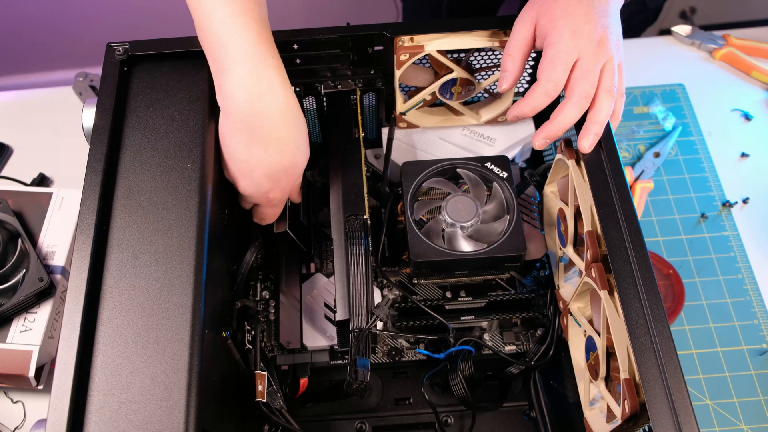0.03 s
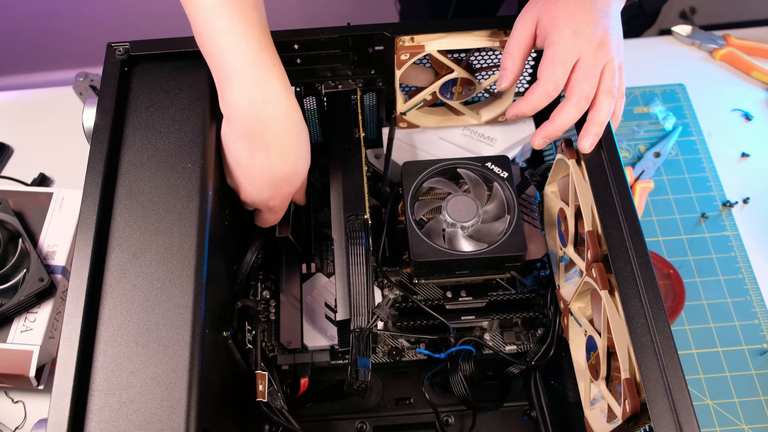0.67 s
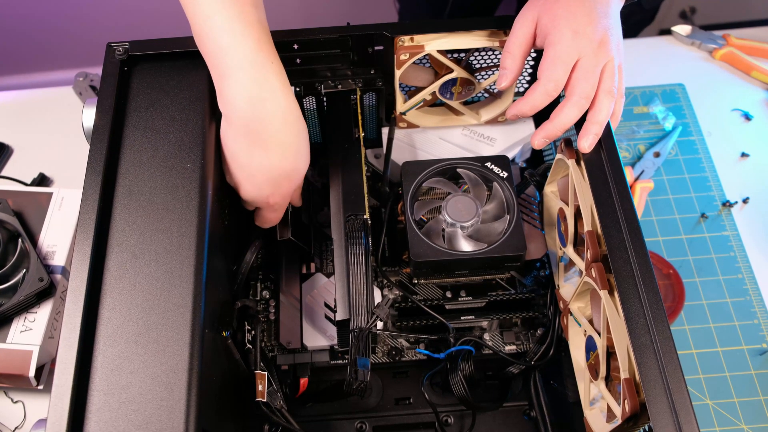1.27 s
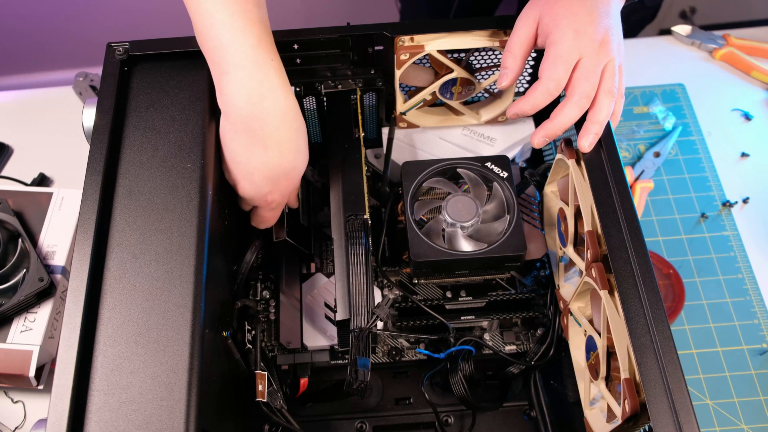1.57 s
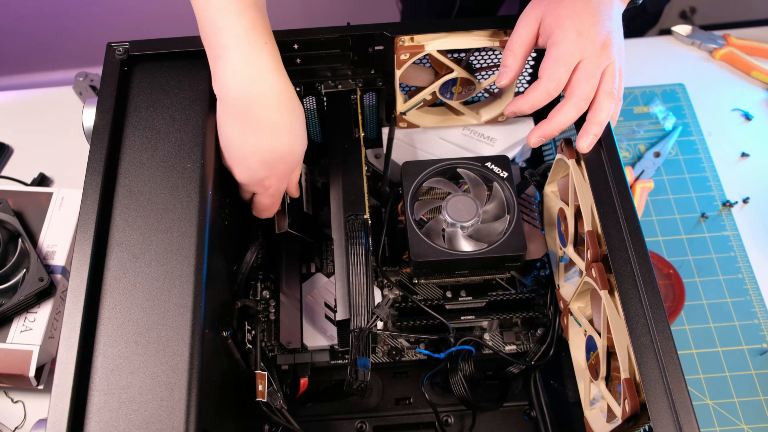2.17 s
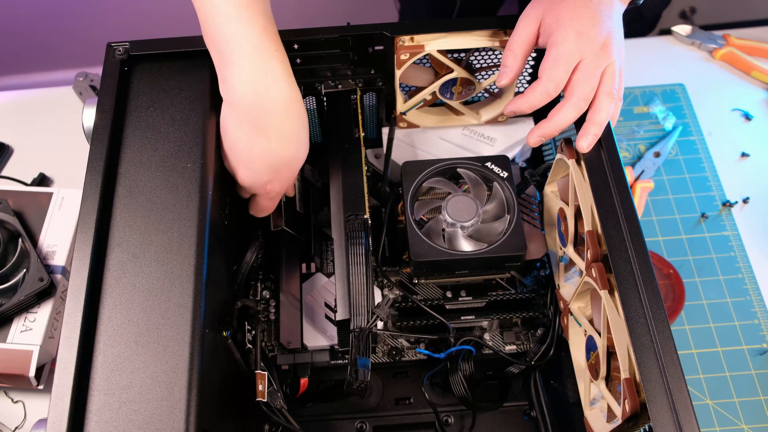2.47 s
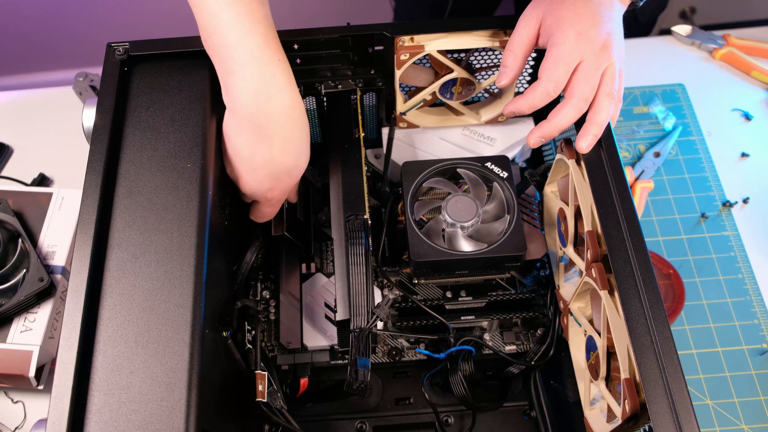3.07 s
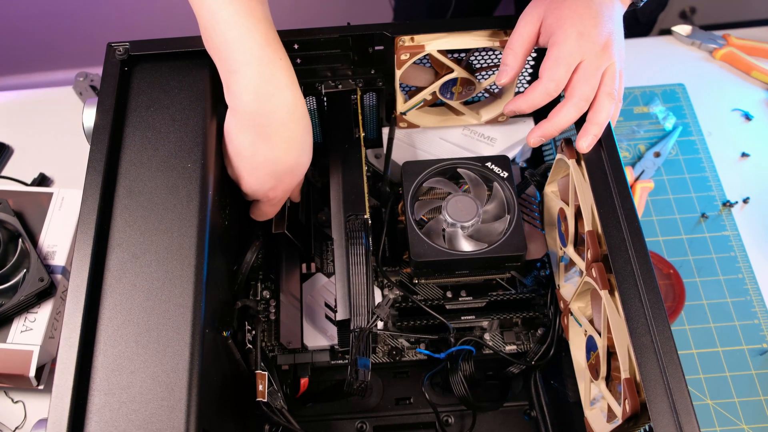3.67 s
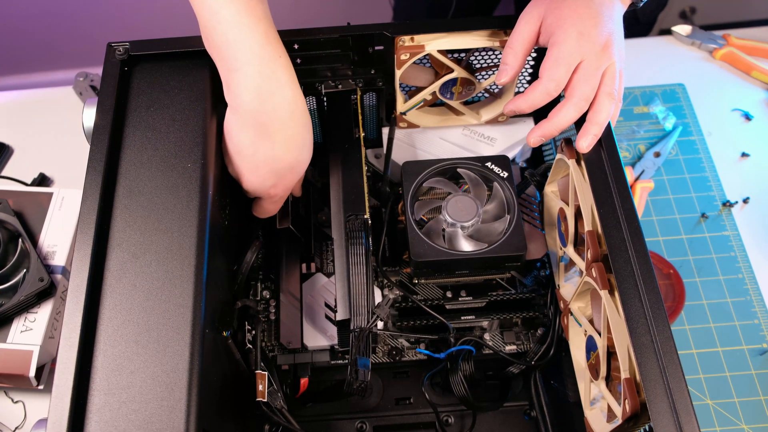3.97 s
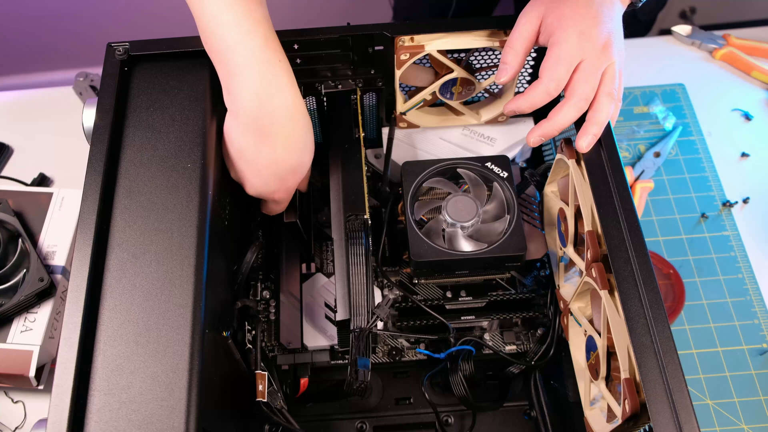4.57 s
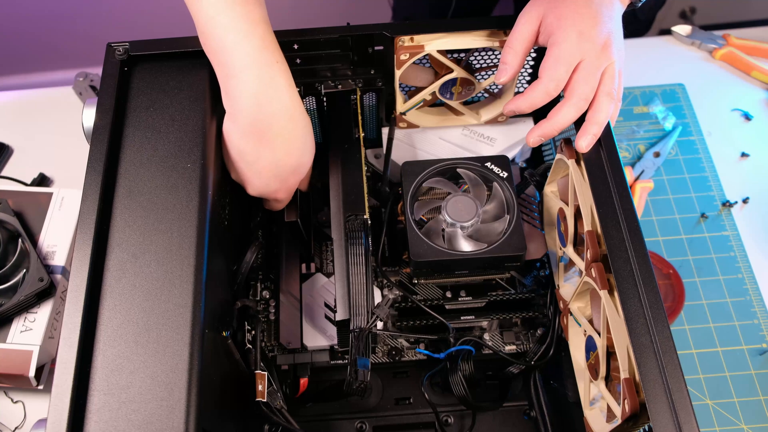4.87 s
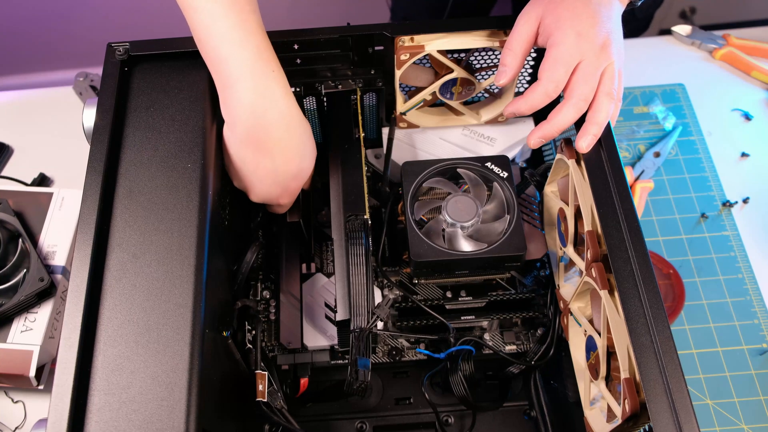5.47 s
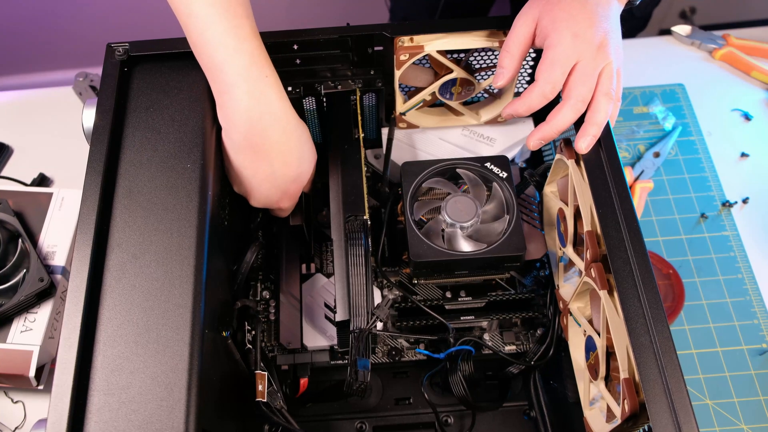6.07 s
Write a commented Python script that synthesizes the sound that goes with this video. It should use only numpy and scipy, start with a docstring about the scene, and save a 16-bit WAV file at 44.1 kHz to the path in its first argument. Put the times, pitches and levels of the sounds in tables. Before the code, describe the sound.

Hands work a card into its slot in an open steel computer case, close to the microphone in a small room. Sharp knocks and short scrapes come first, each leaving a brief metallic ring. After a lull, more clicks, a quick high squeak and a tiny creak follow. It ends with a run of soft plastic taps over a faint low rumble.

```python
"""In a small room, a hand works an expansion card into its slot in an open steel computer case, close by.
The card slides, knocks and scrapes, and fingers brush the frame; each contact sets the case ringing.
The card's edge squeaks and the frame groans as they stick and slip under pressure. Later a plastic part
is nudged with a run of soft taps. The steel panels ring on and the room echoes, over a faint rumble."""
import sys
import numpy as np
from scipy import signal
from scipy.fft import rfft, irfft, next_fast_len
from scipy.io import wavfile

SR = 44100
rng = np.random.default_rng(int(sys.argv[2]) if len(sys.argv) > 2 else 0)


def unload_audio(sound):
    """Save the sound as a 16-bit wav file, at the path given as the first command line argument."""
    columns = np.transpose(np.atleast_2d(sound))
    # keep every value between -1 and 1, then stretch to whole-number steps
    steps = np.round(np.clip(columns, -1, 1) * 32767)
    wavfile.write(sys.argv[1], SR, steps.astype(np.int16))


N = 279153
T = np.arange(SR // 5) / SR   # time within one short sound

# Levels are relative. A ring time (t60) is how long a sound takes to fade by 60 dB.
# notes at which the case rings: f/Hz, width/Hz, level/dB
CASE_MODES = [(435, 20, -12.5), (635, 49, 1.5), (923, 18, -18.5), (944, 19.3, -14.5), (1574, 100, -11),
              (1945, 34, -15.5), (2044, 370, -7.5), (2436, 150, -6.5), (2700, 34, -14), (3010, 150, -18.5),
              (4366, 56, -15), (5100, 86, -10), (5740, 53, -22.5), (5740, 22, -15.5), (6100, 44.4, -24.5),
              (7250, 128, -22.5), (7600, 110, -19), (7505, 50, -15.5), (7600, 36.3, -29), (9000, 52, -39),
              (9180, 46, -27), (10600, 72, -34.5)]
# spectrum of the many small parts on the board: f/Hz, level/dB
SMALL_PARTS = [(35, -46), (60, -27), (159, -13), (335, -13), (359, -12.5), (486, -28), (642, 0),
               (1070, -35), (1590, -13), (3190, -5.5), (3760, -17), (4960, -18), (15500, -42)]
# pitches that the case hardly gives off: f/Hz, width/Hz, depth/dB
CASE_DIPS = [(497, 29, -6.5), (1167, 354, -6), (3700, 590, -6.5)]
# fingers and card sliding lightly: t/s, length/s, level/dB
SLIDES = [(-.04, 0.073, -51), (0.556, 0.16, -52.5), (1.028, 0.16, -48.5), (2.51, 0.18, -59),
          (3.027, 0.15, -60.5), (3.594, 0.2, -56), (4.402, 0.095, -52), (4.723, .12, -59), (5.531, 1, -68)]
# card hitting the case: t/s, level/dB, brightness/(dB per octave), cut in thump and tick/dB, chatter/s
CARD_KNOCKS = [(0.042, -48, -7.5, 23, 0.0073), (0.292, -27, 0.5, 14.5, 0.0022), (0.378, -55, -6, 8, 0.0079),
               (0.505, -49.5, -6.5, 16, 0.042), (0.539, -39, -4, 7.5, 0.0063), (0.627, -43, 2, 7, .014),
               (0.656, -31, .2, 6, 0.025), (0.6725, -27, -1.2, 8, 0.0067), (1.076, -46, -3.5, 5, 0.011),
               (1.0975, -26, -0.55, 6.5, 0.012), (1.106, -25.5, -0.4, 3, 0.0077),
               (2.527, -51, -0.7, 6.5, .009), (2.8734, -37.5, 1.9, 5.5, 0.0038),
               (2.905, -43.5, 1.5, 3, 0.0032), (2.925, -48.5, 1.5, 3.5, 0.011), (3.259, -56, -1.5, 0, .006),
               (3.27, -45.5, -2, 15.5, 0.021), (3.285, -49.5, 0.5, 5.5, 0.0085),
               (3.598, -46, -2, 0.5, 0.0083), (3.762, -25, 2.44, 6.5, 0.013),
               (3.783, -31.5, -1.15, 3, 0.008), (4.004, -36.5, 2.45, 4.5, 0.017),
               (4.126, -45.5, -3.5, 2.5, .003), (4.3, -39.5, -3, 1.5, .015),
               (4.539, -52.5, -4.2, 3.5, 0.0052)]
# edges of a knock's four bands (thump, knock, clack, tick): f/Hz
BAND_EDGES = [100, 480, 1200, 4000, 15000]
# boost for each of those bands: level/dB
BAND_BOOSTS = [0.3, 2.5, -0.5, 0.67]
# light, crisp touches: fingers on the case, and the last three are sharp ticks within the run of plastic taps:
# t/s, level/dB
LIGHT_TOUCHES = [(0.09, -63.5), (1.591, -65.5), (1.739, -68), (3.688, -53.5), (4.199, -59), (4.283, -52),
                 (5.445, -62.5), (5.709, -58.5), (5.98, -59), (6.071, -54)]
# card edge squeaking: t/s, length/s, level/dB, start f/Hz, end f/Hz, overtone level/dB
EDGE_SQUEAKS = [(.444, 0.034, -54, 1740, 1690, -36), (3.447, 0.035, -62.5, 1760, 1730, -25),
                (3.535, 0.021, -44.5, 1745, 1699, -3), (3.547, 0.035, -49, 1683, 1770, -15),
                (3.7065, 0.02, -38.5, 1639, 1684, 11.5), (3.722, 0.033, -30, 1639, 1610, 5),
                (3.748, 0.011, -24.5, 1614, 1615, -4.5)]
# overtones of a squeak: multiple of the pitch, level/dB
SQUEAK_OVERTONES = [(2, -3.5), (3, 2.5), (4, -16), (5, -16), (6, -21.5), (7, -38.5), (8, -35.5)]
# frame juddering: t/s, length/s, level/dB, start f/Hz, end f/Hz, overtone level/dB
FRAME_GROANS = [(.538, 0.024, -29, 661, 662, -36), (.556, 0.014, -39, 670, 700, -27),
                (1.082, 0.015, -31.5, 529, 542, -18), (3.19, 0.18, -58, 700, 640, -39),
                (3.290, 0.016, -36, 670, 670, -6), (4.293, 0.029, -33.5, 621, 613, -37),
                (4.301, 0.038, -36, 308, 312, -12), (6.211, 0.0067, -36.5, 457.4, 501, -35),
                (6.219, 0.02, -53, 480, 456, -29.5)]
# overtones of a groan: multiple of the pitch, level/dB
GROAN_OVERTONES = [(2, -7.5), (3, -9.5), (4, -11.5)]
# card scraping until it catches: catch t/s, swell time/s, body level/dB, grit level/dB
CARD_SCRAPES = [(.668, 0.016, -31, -28.5), (1.1, 0.012, -45, -41), (3.292, 0.035, -42, -63),
                (3.755, 0.027, -38, -30), (4.312, 0.018, -31.5, -44.5)]
# soft taps on plastic: t/s, body level/dB, tick level/dB
PLASTIC_TAPS = [(4.928, -40.5, -56), (5.097, -46, -82), (5.186, -44, -58), (5.541, -43, -61.5),
                (5.626, -45, -70), (5.759, -44, -65.5), (5.841, -43.5, -62.5), (5.916, -44, -67),
                (6.065, -49.5, -69)]
# notes at which the plastic rings: f/Hz, width/Hz, level/dB
PLASTIC_MODES = [(454, 53, -1), (1056, 27, -35), (1198, 38, -5.5), (3040, 33, -18), (3400, 9.1, -4),
                 (3830, 15, -25), (5800, 53, -25), (7000, 34, -15), (7200, 98, -36), (7850, 25.4, -19),
                 (8200, 35, -25), (9000, 34, -38)]
# notes of the steel panels: f/Hz, level/dB, ring time/s (capped in panel_ring)
PANEL_MODES = [(167, 10, 0.11), (329.7, 1.5, 0.54), (430, -12, 0.66), (630, -16, 0.9), (1610, -11.5, 0.22),
               (1900, -26.5, 0.19), (2030, -9.5, 0.33), (2495, -2.5, 0.24), (2930, -7, 0.238),
               (2950, -4, 0.21), (4270, 1, .22), (4700, 1, 0.18), (5130, -1, 0.23), (6040, 2, 0.13),
               (6980, -1.5, 0.18), (7820, -3, .17)]
# echo of the room: f/Hz, level/dB, ring time/s
ROOM_ECHO = [(99.7, 3, 0.32), (303.3, 1, 0.3), (700, -7, 0.34), (1390, 0, 0.29), (2950, -16, 0.49),
             (6110, -10.5, 0.32), (12000, -17, .28)]
# spectrum of the room's steady background: f/Hz, level/dB
ROOM_TONE = [(12, -32), (20, -11), (53, -5), (95, -5), (130, -15.5), (153, -4.5), (215, -7), (240, -11.5),
             (345, -18), (419, -19), (754, -23.5), (1280, -31.5), (2000, -32), (4020, -33.5),
             (15800, -45.5)]

TOP_HZ = 15900


def from_db(db):
    """Turn decibels into a gain."""
    return 10 ** (np.asarray(db) / 20)


def unit(x):
    """Scale to an energy of one."""
    return x / np.sqrt(np.sum(x ** 2) + 1e-20)


def burst(x, db):
    """Scale to the energy of 10 ms of sound at this level."""
    return unit(x) * np.sqrt(SR / 100) * from_db(db)


def band(x, low, high):
    """Keep what lies between two frequencies in Hz."""
    sos = signal.butter(3, [low, min(high, .45 * SR)], "band", fs=SR, output="sos")
    return signal.sosfilt(sos, x + 1e-18)


def add(track, s, x):
    """Mix a sound into the track at s seconds."""
    at = round(s * SR)
    x, at = x[max(-at, 0):], max(at, 0)
    track[at:at + len(x)] += x[:N - at]


def coloured(spectrum, size):
    """Noise with this spectrum and an average power of one."""
    hz, db = np.transpose(spectrum)
    full = next_fast_len(size)
    bins_hz = np.arange(full // 2 + 1) * SR / full
    gain = from_db(np.interp(np.log(bins_hz + 1), np.log(hz), db))
    noise = irfft(rfft(rng.standard_normal(full)) * gain, full)
    return unit(noise[:size]) * np.sqrt(size)


def through(force, response):
    """Shake a body: every instant of the force starts a copy of its response."""
    return signal.fftconvolve(force, response)[:len(force)]


def struck(modes, vary_db):
    """A struck body rings as fading sine waves, whose strengths change from blow to blow."""
    hz, width, db = np.transpose(modes)[:, :, None]
    rings = width * from_db(db) * np.exp(-np.pi * width * T) * np.sin(2 * np.pi * hz * T)
    strengths = from_db(vary_db * rng.standard_normal(len(rings))) * rng.choice([-1, 1], len(rings))
    return unit(strengths @ rings)


def case_response(rattle_t60=0.021, air_t60=0.2, air_db=-5.5):
    """After a blow the case rings, small parts rattle briefly and the air inside dies away."""
    rattle, air = (unit(from_db(-60 * T / t60)) for t60 in (rattle_t60, air_t60))
    wash = coloured(SMALL_PARTS, len(T)) * np.hypot(rattle, from_db(air_db) * air)
    return struck(CASE_MODES, vary_db=3) + wash


def panel_cancelling(x):
    """Neighbouring panels move against each other and weaken some pitches."""
    for hz, width, db in CASE_DIPS:
        near_dip = signal.lfilter(*signal.iirpeak(hz, hz / width, fs=SR), x + 1e-18)
        x = x - (1 - from_db(db)) * near_dip
    return x


def friction(envelope, body_db, grit_db):
    """A stream of tiny catches shakes the case, giving a low body and a high grit."""
    catches = rng.standard_normal(len(envelope)) ** 3 * envelope   # cubing makes the noise spiky
    sound = through(np.pad(catches, (0, len(T))), case_response())
    body, grit = unit(band(sound, 210, 1100)), unit(band(sound, 1400, 14000))
    return np.sqrt(np.sum(envelope ** 2)) * (from_db(body_db) * body + from_db(grit_db) * grit)


def slides():
    """Fingers and card slide lightly, so the friction fades in and out."""
    out = np.zeros(N)
    for s, length, db in SLIDES:
        envelope = np.sqrt(np.abs(np.hanning(int(length * SR))))
        add(out, s, friction(envelope, db, grit_db=db - 13))
    return out


def chatter(decay_s, hits_per_s=4000):
    """The force of a contact: a first hit, then tiny ones. A long, glancing contact starts more softly."""
    glancing = decay_s / (decay_s + 0.0083)
    rise = 1 - np.exp(-(T + 1 / SR) / (0.35 * glancing * decay_s))
    hits = (rng.random(len(T)) < hits_per_s / SR) * rng.standard_normal(len(T))
    first_hit = 0.86 * (1 - glancing) ** 2 * (T == 0)
    return unit(hits * rise * np.exp(-T / decay_s)) + first_hit


def knock(db, tilt_db, middle_db, chatter_s, settle_s=0.0088):
    """A harder blow is brighter, a freer one rings more in the middle; it settles with a weaker thump."""
    octaves = (np.log2(BAND_EDGES[:-1]) + np.log2(BAND_EDGES[1:])) / 2
    levels = db + np.array(BAND_BOOSTS) + tilt_db * (octaves - octaves.mean())
    levels -= middle_db * np.array([1, 0, 0, 1])
    thump_db, tick_db = levels[0], levels[-1]
    hit = through(chatter(chatter_s / 2), case_response())
    body = sum(burst(band(hit, low, high), level)
               for low, high, level in zip(BAND_EDGES, BAND_EDGES[1:], levels))
    crack_db = tick_db - 11 + .8 * min(tick_db + 22, 0)   # only the hardest ticks crack at the very top
    crack = burst(band(hit, 9000, TOP_HZ), crack_db)
    settle = burst(band(case_response(), *BAND_EDGES[:2]), thump_db - 4.5)
    return body + crack + np.pad(settle, (round(settle_s * SR), 0))[:len(T)]


def card_knocks():
    """The card bumps the case as it is worked in."""
    out = np.zeros(N)
    for s, *blow in CARD_KNOCKS:
        add(out, s, knock(*blow))
    return out


def light_touches():
    """Light, crisp knocks: fingers shift their grip and brush the case, and late on sharp ticks join the run of
    plastic taps."""
    out = np.zeros(N)
    for s, db in LIGHT_TOUCHES:
        add(out, s, knock(db, tilt_db=0.15, middle_db=2.5, chatter_s=0.0029))
    return out


def stick_slip(slips, overtones, jitter, rough_db, fade_share, rasp_db):
    """Surfaces grip and let go in short, shaky tones, each with its own amount of overtones and rasp."""
    def noise(low, high):
        return unit(band(rng.standard_normal(len(T)), low, high))[-size:] * np.sqrt(len(T))

    out = np.zeros(N)
    for s, length, db, start_hz, end_hz, overtone_db in slips:
        size = int(length * SR)
        pitch_hz = np.linspace(start_hz, end_hz, size) * (1 + jitter * noise(60, 530))
        phase = 2 * np.pi * np.cumsum(pitch_hz) / SR
        partials = [(0.98, 0)] + [(k, overtone_db + level) for k, level in overtones]
        tone = np.zeros(size)
        for multiple, level in partials:
            strength = from_db(level + rough_db * noise(24, 470))
            tone += strength * np.sin(multiple * phase + rng.uniform(0, 2 * np.pi))
        puffs = noise(1200, 9000) * (1 + np.cos(phase))   # one puff of friction in every cycle
        tone += from_db(overtone_db + rasp_db) * puffs
        add(out, s, np.sqrt(2) * from_db(db) * tone * signal.windows.tukey(size, fade_share))
    return out


def edge_squeaks():
    """The card's edge sticks and slips quickly, making high chirps."""
    return stick_slip(EDGE_SQUEAKS, SQUEAK_OVERTONES,
                      jitter=0.014, rough_db=1.35, fade_share=0.49, rasp_db=-20)


def frame_groans():
    """The frame judders under pressure, lower and less steady than the squeaks."""
    return stick_slip(FRAME_GROANS, GROAN_OVERTONES,
                      jitter=0.03, rough_db=1.5, fade_share=0.28, rasp_db=-26)


def card_scrapes():
    """Friction swells with the pressure and stops when the card catches."""
    out = np.zeros(N)
    for catch_s, swell_s, body_db, grit_db in CARD_SCRAPES:
        envelope = np.exp(-T[T < 2 * swell_s] / swell_s)[::-1]
        add(out, catch_s - len(envelope) / SR, friction(envelope, body_db, grit_db))
    return out


def plastic_taps(rebound_s=0.00445, scuff_t60=0.3):
    """Each tap is a light touch, then a firmer seating, with a thin plastic ring and a fine scuff."""
    out = np.zeros(N)
    damping = np.exp(-T / 0.017)
    for s, body_db, tick_db in PLASTIC_TAPS:
        seat_s = rebound_s * rng.uniform(0.62, 1.32)
        seating = unit(np.exp(-((T - seat_s) / 0.00032) ** 2))
        force = 0.48 * (T == 0) + 0.4 * seating
        scuff = unit(rng.standard_normal(len(T)) * from_db(-60 * T / scuff_t60))
        thud = unit(struck(PLASTIC_MODES, vary_db=1) * damping) + unit(band(scuff * damping, 177, 1380))
        body = band(through(force, thud), 74, 1400)
        tick = 0.95 * struck(PLASTIC_MODES[3:], vary_db=9)   # only the high notes
        tick += 1.6 * unit(band(scuff, 1570, 9000)) + 0.33 * unit(band(scuff, 5100, 6800))
        add(out, s - .002, burst(body, body_db - .5) + burst(tick, tick_db + 4.5))
    return out


def panel_ring(x, longest_t60=0.35):
    """The steel sheets pick up every sound in the case and ring on."""
    out = np.zeros(N)
    for hz, db, t60 in PANEL_MODES:
        r = from_db(-60 / (min(t60, longest_t60) * SR))   # share of the swing left after one sample
        angle = 2 * np.pi * hz / SR
        drive, feedback = [0, 2 * (1 - r) * np.sin(angle)], [1, -2 * r * np.cos(angle), r * r]
        out += from_db(db) * signal.lfilter(drive, feedback, x + 1e-18)
    return out


def room_echo(x, delay_s=0.0015):
    """Dense echoes come back almost at once, and each octave fades at its own rate."""
    t, tail = np.arange(SR * 3 // 4) / SR, 0
    hz, db, t60 = np.transpose(ROOM_ECHO)
    for low in 62.5 * 2 ** np.arange(8):
        level, ring_s = (np.interp(np.log(low * np.sqrt(2)), np.log(hz), column) for column in (db, t60))
        echoes = band(rng.standard_normal(len(t)) * (t > delay_s), low, 2 * low)
        tail += from_db(level) * unit(echoes * from_db(-60 * t / ring_s)) * np.sqrt(2 * low / SR)
    return through(x, tail)


def scene():
    """Mix the handling sounds, the room around them and a trace of hiss in each channel."""
    squeaks, groans = edge_squeaks(), frame_groans()
    contacts = card_knocks() + slides() + card_scrapes() + light_touches()
    handling = panel_cancelling(contacts) + plastic_taps() + groans
    drive = handling + from_db(-2.5) * squeaks   # the small squeaking edge stirs case and room less
    tails = from_db(-7) * panel_ring(drive) + from_db(-3) * room_echo(drive)
    background = from_db(-59.5) * coloured(ROOM_TONE, N)
    hiss = from_db(-70) * rng.standard_normal((2, N))
    return handling + squeaks + tails + background + hiss


def record(dry):
    """Cut off the highest treble steeply."""
    return signal.sosfilt(signal.ellip(10, .1, 70, TOP_HZ, fs=SR, output="sos"), dry)


dry = scene()
out = record(dry)
unload_audio(out)
```